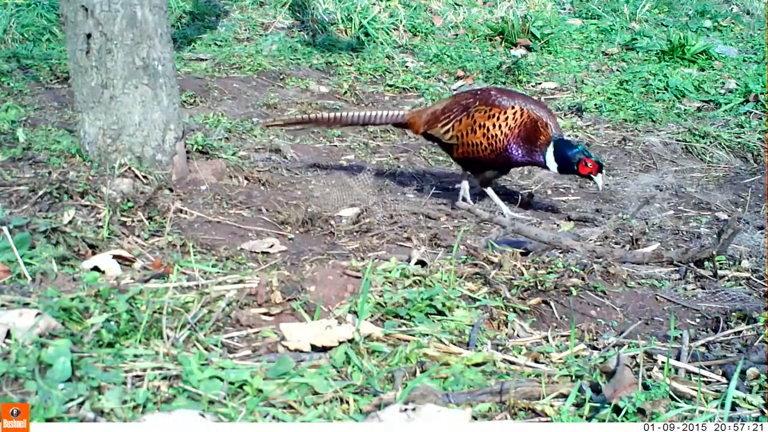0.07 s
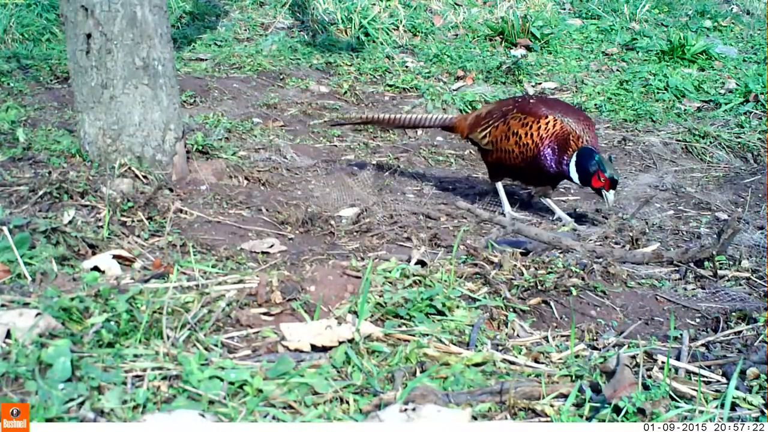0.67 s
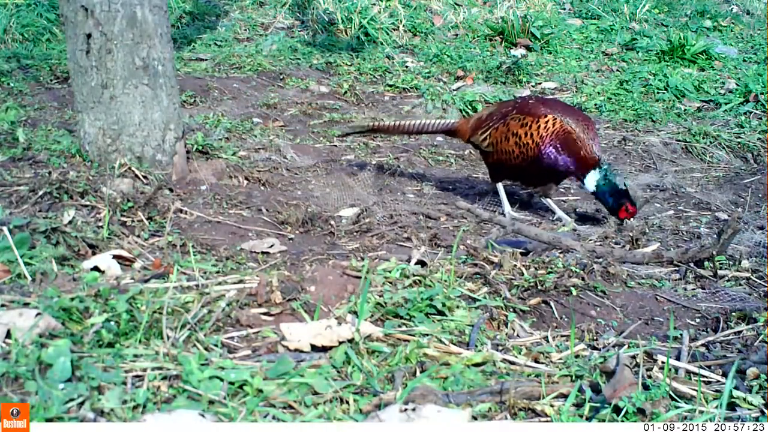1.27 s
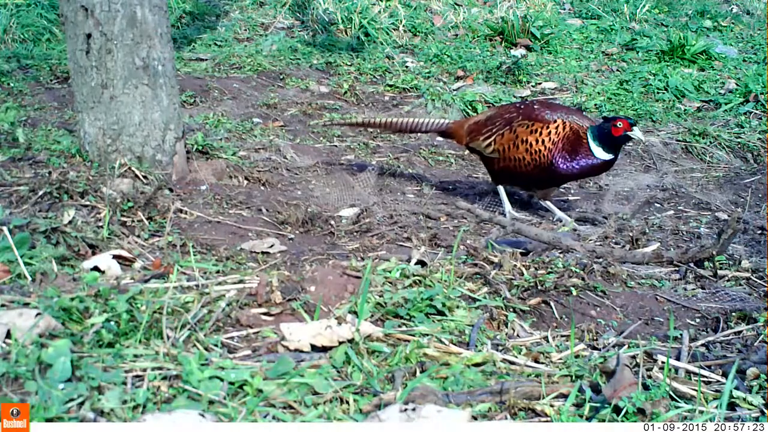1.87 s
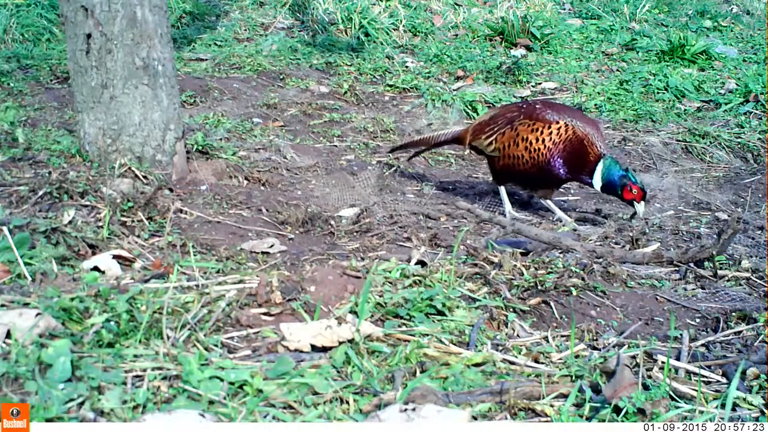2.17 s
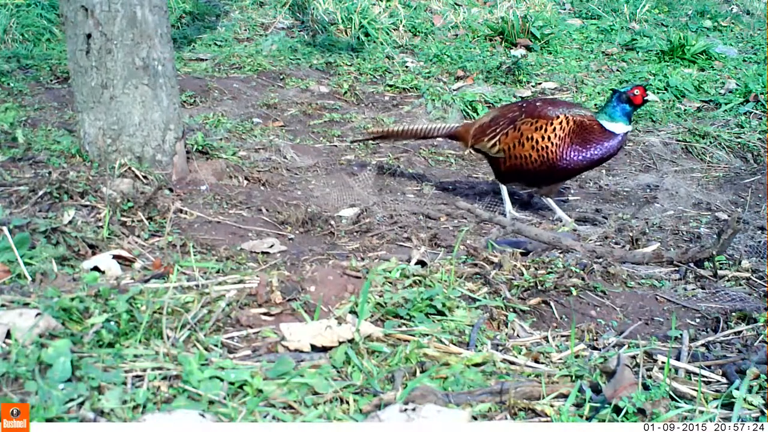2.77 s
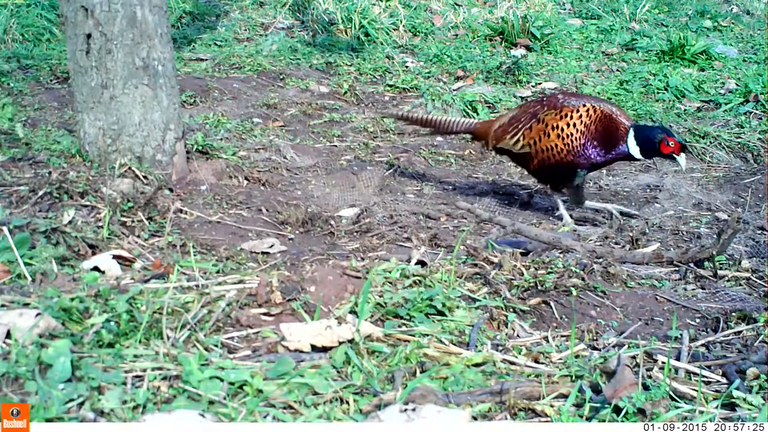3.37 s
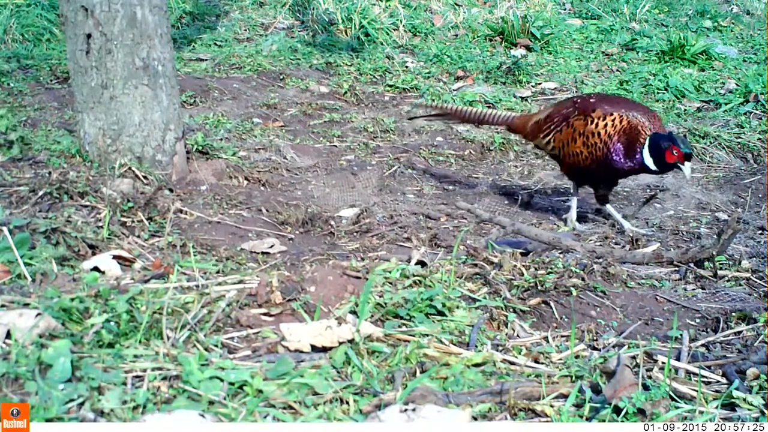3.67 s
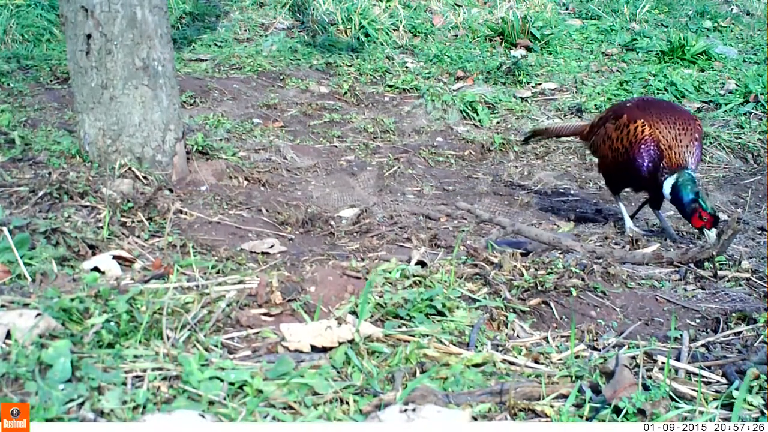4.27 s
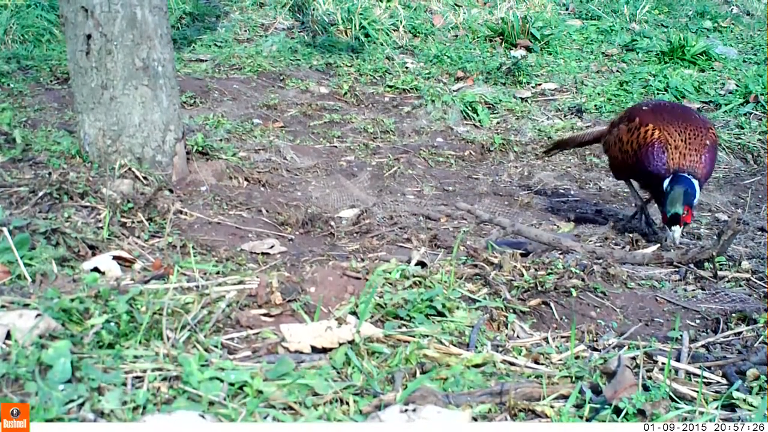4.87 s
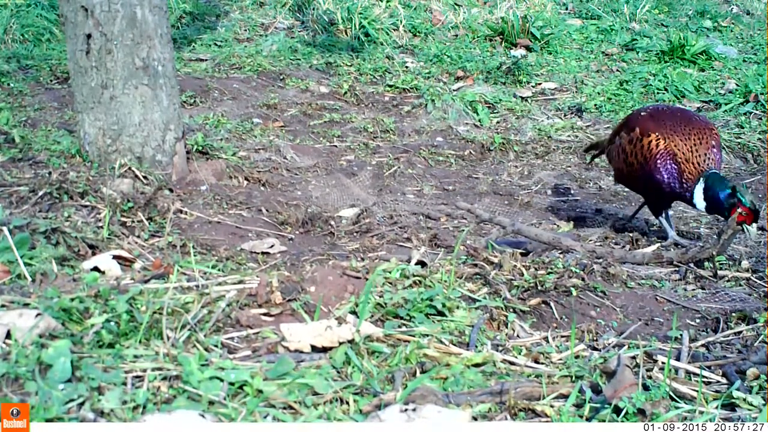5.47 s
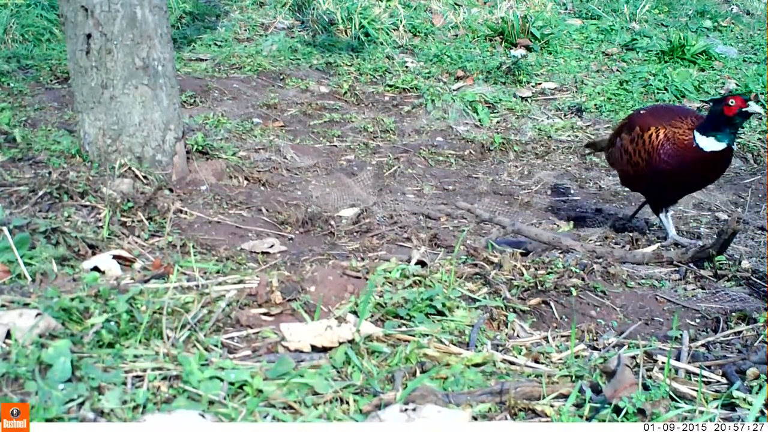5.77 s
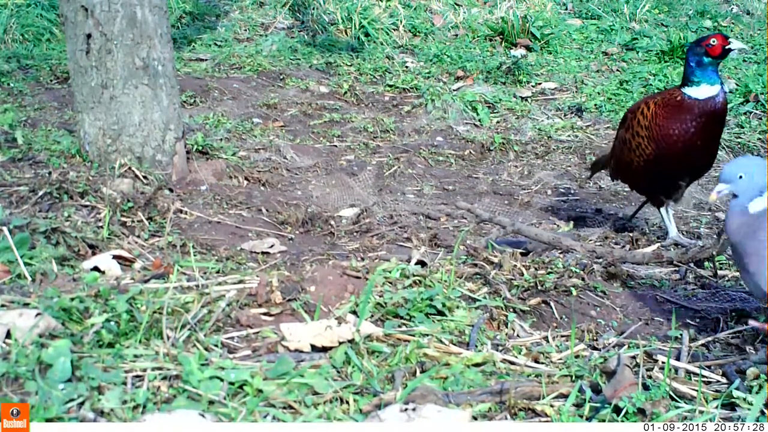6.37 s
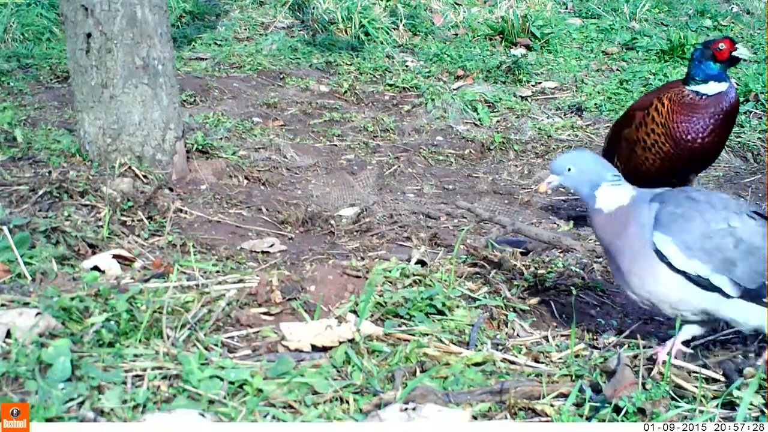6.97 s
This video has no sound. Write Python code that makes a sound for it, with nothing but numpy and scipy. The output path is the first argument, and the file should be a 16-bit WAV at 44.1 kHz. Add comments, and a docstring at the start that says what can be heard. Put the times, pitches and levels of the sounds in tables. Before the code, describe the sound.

Wind rumbles on the microphone over a steady hiss while small birds chirp and a pheasant and pigeon faintly rustle dry leaves.

```python
"""Birds foraging in windy woodland

A pheasant and a pigeon forage in front of a small camera near the ground: dry leaves rustle and
tick under beak and feet, and the pigeon brushes through the grass. Gusts buffet the microphone.
Small birds whistle in the trees and a far bird gives one nasal cry, all echoing off the trunks.
Under everything lies a steady hiss, coloured by the microphone's resonance near 4 kHz."""
import sys
import numpy as np
from scipy import signal
from scipy.fft import rfft, irfft, next_fast_len
from scipy.io import wavfile

SR = 44100
rng = np.random.default_rng(int(sys.argv[2]) if len(sys.argv) > 2 else 0)


def to_wav(sig):
    """Store sig (one row per channel, or 1-D mono) as 16-bit WAV at the path in sys.argv[1].

    Samples outside -1..1 are clipped; the rate is SR.
    """
    pcm = np.clip(np.atleast_2d(sig), -1, 1) * 32767
    pcm = np.round(pcm).astype(np.int16)
    wavfile.write(sys.argv[1], SR, pcm.T)  # frames by channels


N = 309582
TIME = np.arange(N) / SR

# The tone of the hiss, peaking where the microphone resonates: pitch_hz, gain_db
MIC_TONE = [(1200, -40), (2200, -23), (2900, -11.5), (3300, -5.5), (3650, -1), (4000, 5), (4400, -4.5),
            (5000, -14), (6000, -21), (7500, -22.5), (10000, -24), (12500, -24.5), (13600, -25.5),
            (14300, -37)]


def from_db(db):
    """Turn decibels into a number to multiply a sound by."""
    return 10 ** (np.asarray(db) / 20)


def rms_one(x):
    """Scale a sound so that its average strength (rms) is 1."""
    return x / np.sqrt(np.mean(x ** 2) + 1e-20)


def in_time(points):
    """Join (time_s, value) points with straight lines, giving a value for every sample."""
    times_s, values = np.transpose(points)
    return np.interp(TIME, times_s, values)


def colour(x, tone):
    """Shape a sound by (pitch_hz, gain_db) points, falling 30 dB an octave past both ends."""
    hz, db = np.transpose(tone)
    size = next_fast_len(N)
    octave = np.log2(np.maximum(np.fft.rfftfreq(size, 1 / SR), 1))
    outside = np.abs(octave - np.clip(octave, np.log2(hz[0]), np.log2(hz[-1])))
    gain = from_db(np.interp(octave, np.log2(hz), db) - 30 * outside)
    return irfft(rfft(x, size) * gain, size)[:N]


def noise(tone):
    """Noise with the given tone and a strength of 1."""
    return rms_one(colour(rng.standard_normal(N), tone))


def drift(rate_hz):
    """A smooth random wobble of strength 1, changing about rate_hz times a second."""
    r = np.exp(-2 * np.pi * rate_hz / SR)
    return rms_one(signal.lfilter([1], [1, -2 * r, r * r], rng.standard_normal(N + SR))[SR:])


def add(out, start_s, sound):
    """Mix a sound into out, beginning at start_s."""
    at = max(int(start_s * SR), 0)
    out[at:at + len(sound)] += sound[:max(N - at, 0)]


def swells(floor_db, rows):
    """Level in dB of a floor plus smooth swells: middle_s, length_s (at half power), level_db."""
    power = from_db(floor_db) ** 2
    for middle_s, length_s, level_db in rows:
        u = np.linspace(-4, 4, int(4 * length_s * SR))
        add(power, middle_s - 2 * length_s, from_db(level_db) ** 2 * .5 ** (u * u))
    return 10 * np.log10(power)


def glide(length_s, start_hz, middle_hz, end_hz):
    """Pitch and loudness of one note: it slides, hooks at both ends, and fades in and out."""
    u = np.linspace(-1, 1, int(length_s * SR))
    slide = (end_hz - start_hz) / 2 * u
    hook = ((start_hz + end_hz) / 2 - middle_hz) * np.abs(u) ** 2.4
    return middle_hz + slide + hook, np.sqrt(np.abs(np.cos(np.pi * u / 2)))


def background(air_db=-62.5, hiss_trim_db=-0.5, flicker_db=1.5):
    """Distant air and the microphone's resonant hiss, which flickers slightly."""
    # The tone of distant air: pitch_hz, gain_db
    air_tone = [(88, -23), (150, -1), (372, -2), (628, -9.5), (667, -10), (788, -12.5), (1330, -17),
                (2600, -18), (3380, -32), (5720, -120)]
    # The slow rise and fall of the hiss: time_s, level_db (before the trim)
    hiss_levels = [(0.0, -60), (0.7, -62), (1.22, -60), (1.4, -58.5), (1.68, -56.5), (2.1, -60),
                   (3.8, -59.5), (4.85, -58.5), (5.15, -54.5), (5.58, -62), (5.85, -60), (7.02, -55.5)]
    hiss = noise(MIC_TONE) * from_db(in_time(hiss_levels) + hiss_trim_db + flicker_db * drift(10.3))
    return hiss + noise(air_tone) * from_db(air_db)


def wind(lumpy_db=1.5, burst_db=3.0, rumble_boost_db=3.0, fine_share=0.34):
    """Big swirls of air rumble; as the gust grows they break into flutter and fine turbulence."""
    # The tones of the deep rumble, the flutter above it and the fine turbulence: pitch_hz, gain_db
    rumble_tone = [(14, 9), (25, -3.5), (50, -4.5), (80, -11), (130, -15.5), (220, -36.5)]
    flutter_tone = [(60, -4.5), (110, 0), (160, -1), (230, -6), (320, -17.5), (450, -30)]
    fine_tone = [(150, -35), (260, 6), (400, 0), (700, -9.5), (1000, -19), (1500, -25.5), (2500, -53)]
    # A light breeze, then one long gust: time_s, rumble_db (before the boost)
    breeze = [(0.0, -48.5), (0.3, -43.5), (0.7, -49.5), (0.92, -47.5), (1.2, -48), (1.7, -51.5),
              (2.05, -47), (2.5, -49.5), (3.36, -45.5), (3.45, -32.5), (4.4, -33), (5.0, -27), (5.5, -33),
              (5.92, -40), (6.15, -35), (6.4, -44.5), (7.02, -35.5)]
    # Short blasts on top of it: middle_s, length_s, rumble_db (before the boost), fine_db
    buffets = [(0.4, 0.072, -37, -93), (0.996, 0.14, -38, -83), (2.065, 0.054, -44, -86),
               (3.428, 0.026, -25, -47.5), (3.537, .05, -41, -54.5), (3.759, 0.043, -31.5, -60.5),
               (3.908, 0.035, -26.5, -62), (4.015, 0.049, -23, -43.5), (4.1, 0.076, -23.5, -61),
               (4.227, 0.035, -35, -53.5), (4.332, 0.032, -28, -61), (4.391, 0.043, -27.5, -51.5),
               (4.594, 0.062, -34, -57), (4.718, 0.02, -23, -58), (4.861, 0.043, -28, -48.5),
               (4.976, 0.064, -23, -52), (5.039, 0.035, -19.5, -41.5), (5.167, 0.05, -22, -48.5),
               (5.237, .06, -27, -46.5), (5.321, 0.034, -25, -46), (5.39, 0.034, -31, -53.5),
               (5.517, 0.059, -34, -61), (5.68, 0.038, -26, -57.5), (5.797, 0.15, -32, -64),
               (6.065, .08, -32.5, -75), (6.156, 0.062, -28.5, -56)]
    breeze_db = in_time(breeze)
    calm_fine_db = -79.5 + 0.29 * (breeze_db + 49.5)   # faint between blasts, following the breeze
    rumble_db = swells(breeze_db, [(s, length_s, db) for s, length_s, db, _ in buffets])
    fine_db = swells(calm_fine_db, [(s, length_s, db) for s, length_s, _, db in buffets])
    flutter_db = (1 - fine_share) * rumble_db + fine_share * fine_db
    lumps = drift(14)   # shared, so the three layers surge together
    rumble = rms_one(noise(rumble_tone) * from_db(lumpy_db * lumps))
    flutter = rms_one(noise(flutter_tone) * from_db(burst_db * (lumps + 0.99 * drift(30))))
    fine = rms_one(noise(fine_tone) * from_db(burst_db * (0.45 * lumps + 1.3 * drift(70))))
    return (rumble * from_db(rumble_db + rumble_boost_db)
            + flutter * from_db(flutter_db)
            + fine * from_db(fine_db))


def chorus(centre_hz=4500, sweep=0.0692, base_db=-53, spread_db=1.5):
    """Distant twitters: short random glides, loudest where the microphone resonates."""
    # How busy the far birds are: time_s, notes_per_s
    note_rates = [(0, 18), (2.4, 20), (3.0, 44), (4.8, 42), (5.6, 18), (6.1, 36)]
    out = np.zeros(N)
    mic_hz, mic_db = np.transpose(MIC_TONE)
    starts = TIME[rng.random(N) < in_time(note_rates) / SR]
    variations = rng.standard_normal((len(starts), 5)).clip(-2, 2)
    for start_s, (pitch, slope, arch, length, level) in zip(starts, variations):
        length_s = 0.0225 * np.exp(0.31 * length)
        note_hz = centre_hz * np.exp(.15 * pitch)
        start_hz, end_hz = note_hz * (1 - sweep * slope), note_hz * (1 + sweep * slope)
        hz, swell = glide(length_s, start_hz, note_hz * (1 + 0.0144 * arch), end_hz)
        gain = from_db(base_db + spread_db * level + .8 * np.interp(hz, mic_hz, mic_db))
        add(out, start_s, gain * swell * np.sin(2 * np.pi * np.cumsum(hz) / SR))
    return out


def songbirds(rasp_hz=330, flutter_db=3.5):
    """Small birds whistle almost pure tones; a fast, uneven warble makes some of them raspy."""
    # The whistles: start_s, length_s, start_hz, middle_hz, end_hz, rasp (0 to 1), relative_db
    notes = [(.11, .06, 8200, 8400, 8200, .2, -80.5), (0.196, .13, 4330, 4200, 3935, 0.24, -57),
             (.267, 0.18, 3865, 3800, 3875, .45, -55.5), (.415, 0.063, 5800, 5560, 5100, 0.2, -74),
             (.663, 0.026, 5200, 5640, 5950, .25, -69), (0.685, .16, 8060, 7950, 7900, .85, -74.5),
             (.934, .059, 3910, 3920, 4070, 0.22, -54.5), (1.511, 0.11, 4190, 4090, 4000, 0.18, -56),
             (1.72, .045, 6000, 5550, 4800, .1, -72), (1.817, 0.029, 6050, 6400, 6300, 0, -67.5),
             (1.999, .05, 6000, 6000, 5700, 0.3, -73), (2.27, 0.027, 4170, 4550, 4900, 0.34, -56.5),
             (2.85, .025, 8200, 7550, 7200, .1, -74), (2.972, 0.015, 3780, 4360, 4650, .1, -59),
             (3.268, 0.033, 4700, 4630, 4500, .2, -62), (3.315, 0.024, 4100, 4270, 4420, 0.1, -56.5),
             (3.883, 0.043, 4010, 3950, 3280, .16, -56.5), (3.932, .055, 5350, 5160, 4400, 0.1, -70),
             (4.05, 0.038, 4185, 3670, 3300, 0.43, -49), (4.139, 0.016, 2500, 2700, 3260, .22, -55.5),
             (4.142, 0.024, 3630, 3600, 3230, 0, -47), (4.38, 0.17, 7560, 7800, 7050, 0.1, -68.5),
             (4.582, 0.11, 6850, 7750, 6800, 0, -67), (4.755, .135, 7000, 7600, 7000, 0, -69),
             (4.844, 0.062, 4020, 3960, 3980, 0, -54.5), (4.981, .033, 3680, 3860, 3800, 0, -44),
             (5.009, 0.088, 3790, 3722, 3680, 0.02, -44.5), (5.109, 0.11, 3980, 3880, 3910, 0.12, -56.5),
             (5.172, .05, 5750, 5700, 5300, .35, -66.5), (5.20, 0.12, 3435, 3490, 3533, 0.04, -51),
             (5.298, 0.27, 8250, 8130, 8150, .15, -78.5), (5.72, 0.11, 8000, 8120, 8300, .2, -80),
             (5.823, 0.031, 5370, 5830, 6150, .3, -66), (5.875, 0.057, 4880, 4400, 3320, 0.7, -54),
             (5.94, 0.045, 3620, 3880, 3830, .17, -51.5), (6.02, .055, 4500, 4440, 4540, 0.14, -55.5),
             (6.128, .095, 3950, 3900, 4120, 0.44, -52.5), (6.296, 0.025, 3560, 3540, 3420, 0.1, -55),
             (6.304, .12, 6380, 6300, 5670, .3, -72.5), (6.739, 0.25, 3880, 3873, 4020, .11, -53.5)]
    out = np.zeros(N)
    warble, flutter = drift(185), from_db(flutter_db * drift(59))
    for start_s, length_s, start_hz, middle_hz, end_hz, rasp, relative_db in notes:
        hz, swell = glide(length_s, start_hz, middle_hz, end_hz)
        here = (int(start_s * SR) + np.arange(len(hz))) % N
        phase = 2 * np.pi * np.cumsum(hz + rasp * rasp_hz * warble[here]) / SR
        add(out, start_s, np.sqrt(2) * from_db(relative_db) * swell * flutter[here] * np.sin(phase))
    return out


def trunk_echoes(calls, echoes_per_s=900, fade_s=.4, delay_s=.012):
    """Tree trunks scatter a call into many small echoes, which fall by 60 dB in fade_s."""
    t = TIME[:SR]
    echoes = rng.standard_normal(SR) * (rng.random(SR) < echoes_per_s / SR)
    echoes *= from_db(-60 * t / fade_s) * (t > delay_s)
    return signal.fftconvolve(calls, echoes / np.sqrt(np.sum(echoes ** 2)))[:N]


def eddies(low_cut_hz=28):
    """Each small swirl of air is a sharp pressure bump; the microphone's bass cut makes it swing back."""
    # Swirls that hit the microphone's opening: middle_s, peak_db (before the bass cut), half_width_s
    hits = [(0.412, -15, 0.0054), (0.425, -18, 0.0045), (0.982, -14, 0.003), (3.045, -28.5, 0.0019),
            (3.401, -7, 0.0024), (3.425, -12.5, 0.00096), (3.436, -7.5, 0.0045), (3.546, -15.5, 0.0021),
            (3.892, -19, 0.0013), (4.06, -18.5, 0.0012), (4.081, -15.5, 0.0015), (4.693, -13.5, 0.002),
            (4.833, -15, 0.002), (5.021, -17, 0.003), (5.036, -23, 0.00065), (5.154, -11.5, 0.004),
            (5.224, -23, 0.00083), (5.283, -10, 0.0024), (5.637, -16, 0.0018), (6.077, -15.5, 0.0027),
            (6.187, -28, 0.0032)]
    bumps = sum(from_db(peak_db) / (1 + ((TIME - middle_s) / half_width_s) ** 2)
                for middle_s, peak_db, half_width_s in hits)
    return signal.sosfilt(signal.butter(1, low_cut_hz, "high", fs=SR, output="sos"), bumps)


def ticks(fade_s=0.0093):
    """Pecks and snapping stalks: short, dry bursts of noise, each in one broad range of pitch."""
    # The pecks and snaps: start_s, peak_db, pitch_hz, width_hz
    snaps = [(1.2006, -50.5, 5700, 1600), (1.695, -49, 11400, 4000), (1.718, -53, 11500, 4000),
             (2.0976, -56, 12000, 4000), (2.7831, -56, 11500, 4000), (3.7698, -51, 12000, 4000),
             (4.1634, -55, 12000, 4000), (4.3016, -55, 11900, 4000), (4.9948, -47, 7000, 4000),
             (5.0749, -47, 5240, 2500), (5.092, -45, 5160, 2500), (5.1372, -56, 11200, 7000),
             (5.3807, -52, 8600, 10000), (5.879, -42, 4900, 2400), (5.9254, -55, 11500, 4000),
             (6.346, -39, 3830, 2000), (6.4747, -57, 8100, 7000), (6.5026, -53, 7900, 7000)]
    out = np.zeros(N)
    fade = from_db(-60 * TIME[:SR // 20] / fade_s)
    for start_s, peak_db, pitch_hz, width_hz in snaps:
        band_hz = np.clip([pitch_hz - width_hz / 2, pitch_hz + width_hz / 2], 500, .45 * SR)
        burst = rng.choice([-1, 1], len(fade)) * fade
        crack = signal.sosfilt(signal.butter(2, band_hz, "band", fs=SR, output="sos"), burst)
        add(out, start_s, from_db(peak_db) * crack / np.abs(crack).max())
    return out


def rustle(cracks_per_s=900, clump_db=1.0, restless_db=3.5, rise_db_per_s=0.85):
    """Dry leaves and grass give off clumps of tiny cracks, swelling with each scuff."""
    # The tone of dry leaves through the microphone: pitch_hz, gain_db
    leaf_tone = [(1900, -20), (2800, -0.5), (4000, 5.5), (5200, -2), (7000, -8.5), (10000, -12),
                 (12700, -1.5), (14000, -26)]
    # Beak and feet stir the leaves: middle_s, length_s, level_db
    scuffs = [(1.365, 0.045, -65), (1.414, 0.024, -62.5), (1.877, 0.079, -67), (2.254, 0.028, -65),
              (3.046, 0.056, -76), (3.613, 0.056, -64), (4.253, .04, -65), (4.342, 0.034, -63),
              (4.425, .07, -67), (4.57, .04, -69), (4.98, 0.03, -60), (5.09, .06, -62.5),
              (5.384, 0.027, -58), (5.653, .06, -71), (6.506, .04, -64), (6.61, 0.037, -70),
              (6.71, 0.035, -66), (6.83, 0.049, -65), (6.925, 0.049, -61), (7.01, .04, -67.5)]
    sizes = from_db(-5.5 * np.minimum(rng.exponential(1, N), 3)) * rng.choice([-1, 1], N)
    cracks = sizes * (rng.random(N) < cracks_per_s / SR) * from_db(clump_db * drift(50))
    # Faint stirring between scuffs grows as the pigeon walks up.
    stir_db = -77.5 + rise_db_per_s * TIME + restless_db * drift(4.7)
    return rms_one(colour(cracks, leaf_tone)) * from_db(swells(stir_db, scuffs))


def far_cry(start_s=2.46, waver_hz=10):
    """A far bird's call rises and falls in pitch; its fifth overtone, near the microphone's resonance, stands
    out strongly."""
    # The tones in the call: pitch_multiple, relative_db
    harmonics = [(1, -68.5), (3, -73), (4, -72.5), (5, -61.5)]
    hz, swell = glide(length_s=0.27, start_hz=580, middle_hz=712, end_hz=620)
    phase = 2 * np.pi * np.cumsum(hz + waver_hz * drift(67)[:len(hz)]) / SR
    voice = sum(from_db(db) * np.sin(multiple * phase) for multiple, db in harmonics)
    out = np.zeros(N)
    add(out, start_s, swell * voice)
    return out


def grass_brush(middle_s=6.93, length_s=0.61, level_db=-70.5):
    """The pigeon's body brushes through the grass with a soft swish as it walks in."""
    # The tone of the swish: pitch_hz, gain_db
    grass_tone = [(900, -3), (1500, -2), (2800, -2), (3600, -3)]
    swell = .5 ** (2 * ((TIME - middle_s) / length_s) ** 2)
    return noise(grass_tone) * from_db(level_db) * swell


def scene(direct_db=-1, echo_db=-6.5):
    """Wind on the microphone, birds in the trees and foraging on the ground, in one channel."""
    calls = songbirds() + far_cry()
    twitters = chorus() / 2   # half arrives directly, half as echo
    birds = from_db(direct_db) * calls + twitters + trunk_echoes(from_db(echo_db) * calls + twitters)
    return (wind() + eddies() + birds + rustle() + grass_brush() + ticks() + background())[None, :]


def record(dry, cutoff_hz=13900):
    """The highest treble is cut off steeply."""
    return signal.sosfilt(signal.ellip(10, .2, 80, cutoff_hz, fs=SR, output="sos"), dry)


dry = scene()
out = record(dry)
to_wav(out)
```